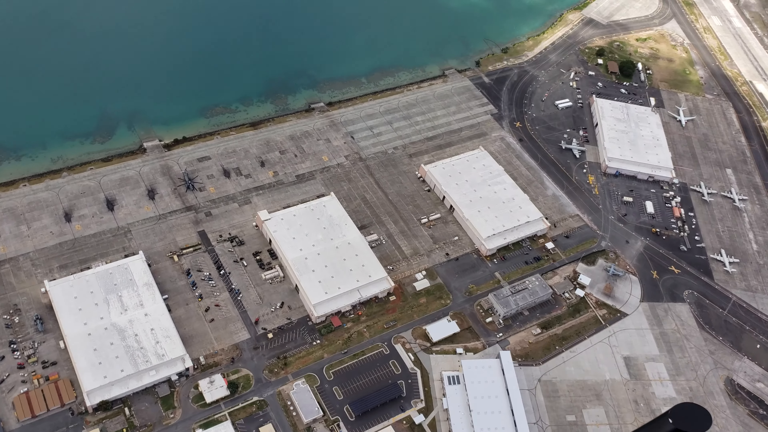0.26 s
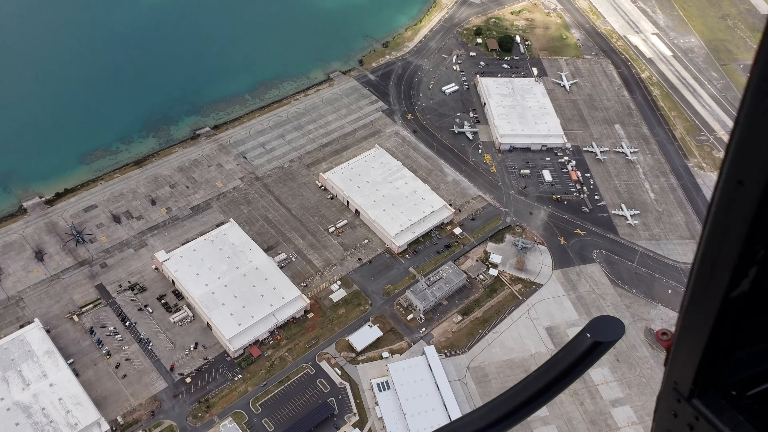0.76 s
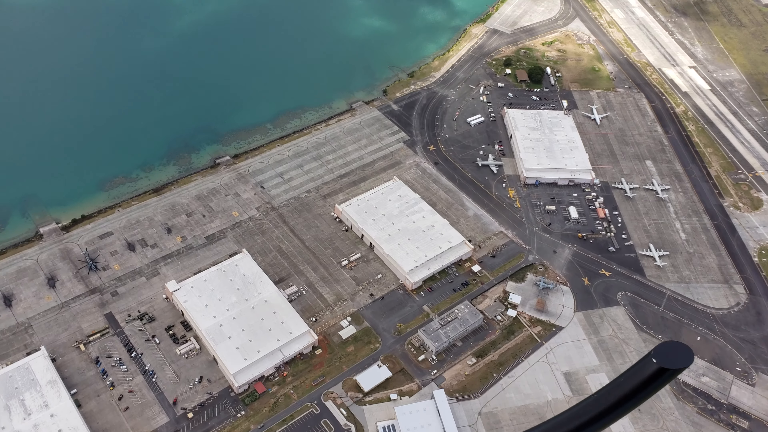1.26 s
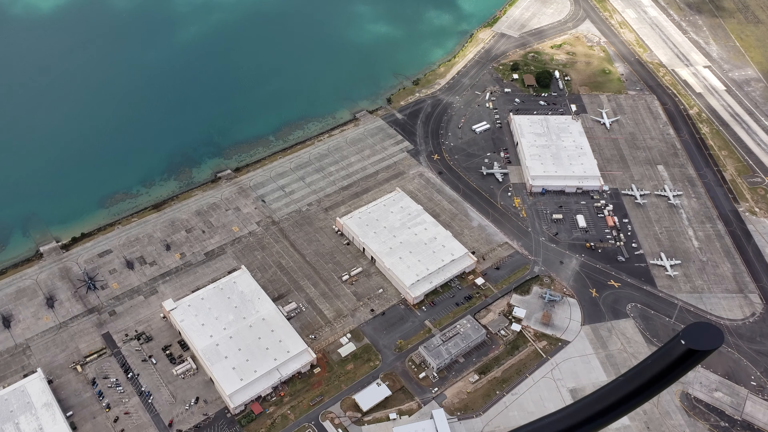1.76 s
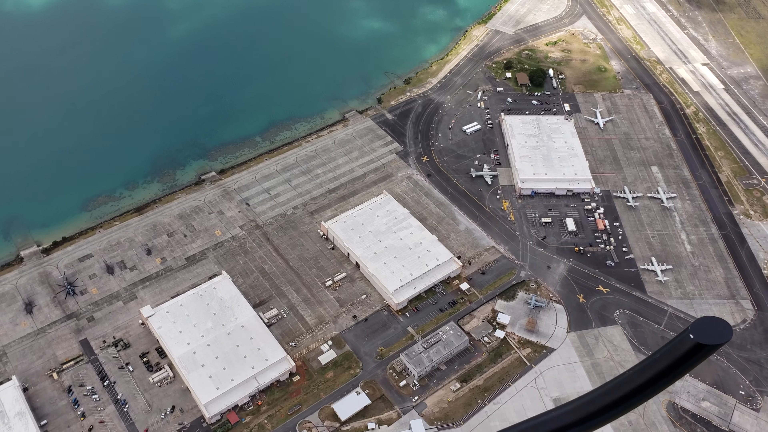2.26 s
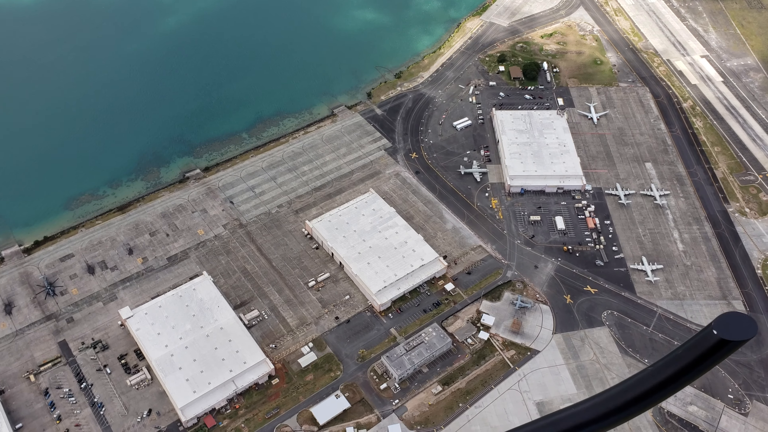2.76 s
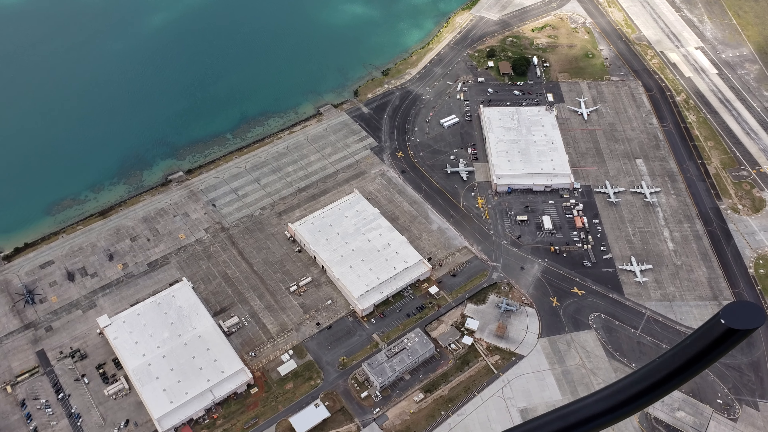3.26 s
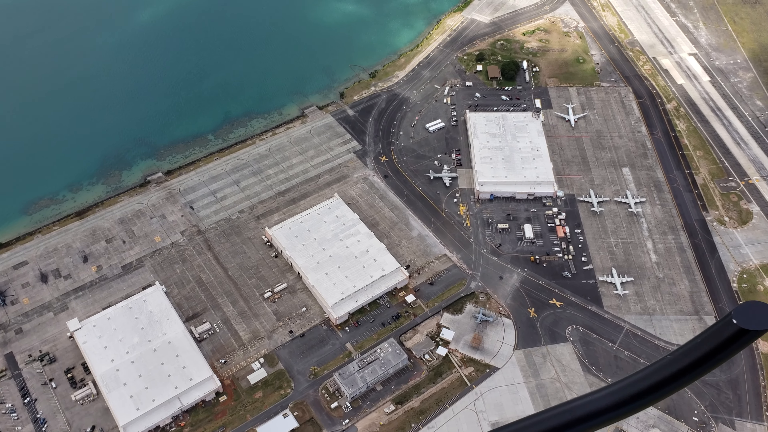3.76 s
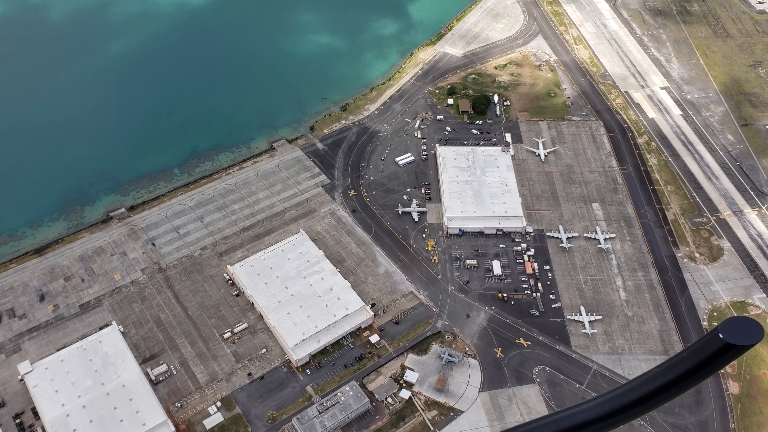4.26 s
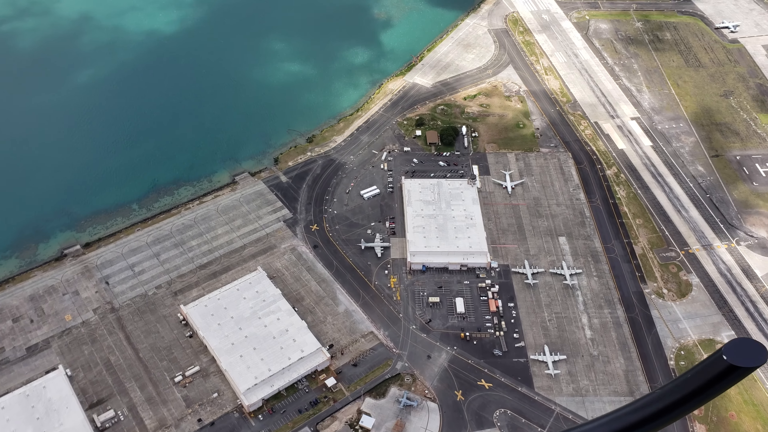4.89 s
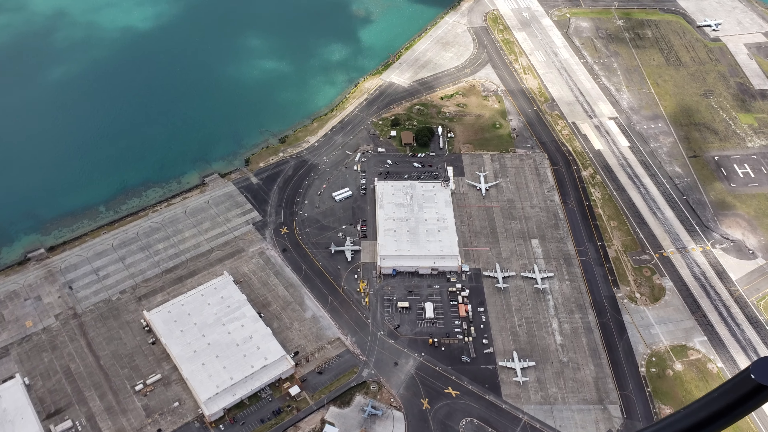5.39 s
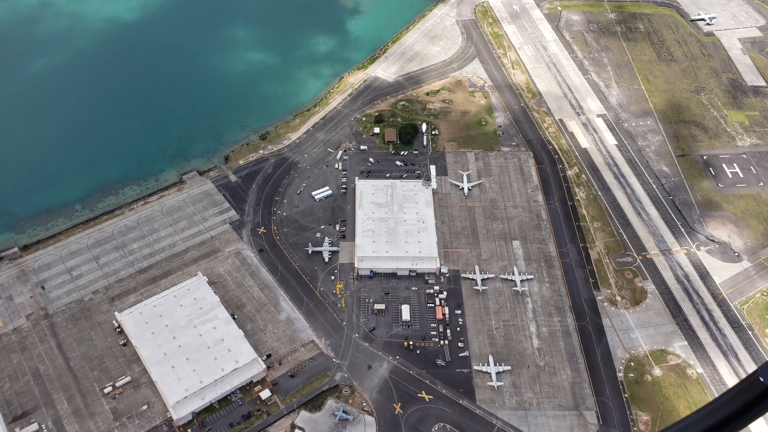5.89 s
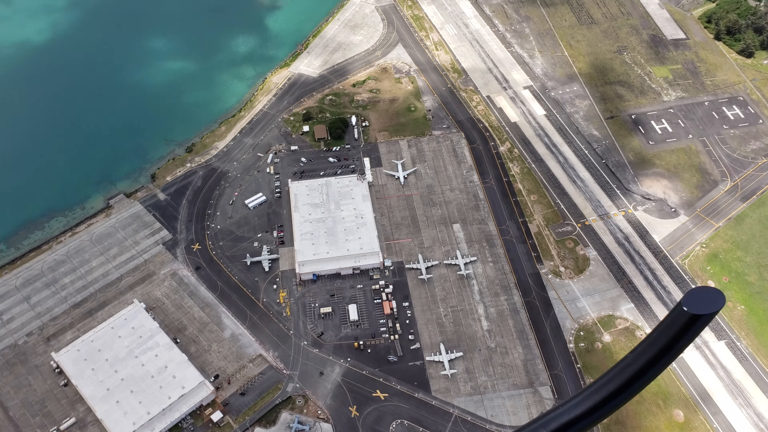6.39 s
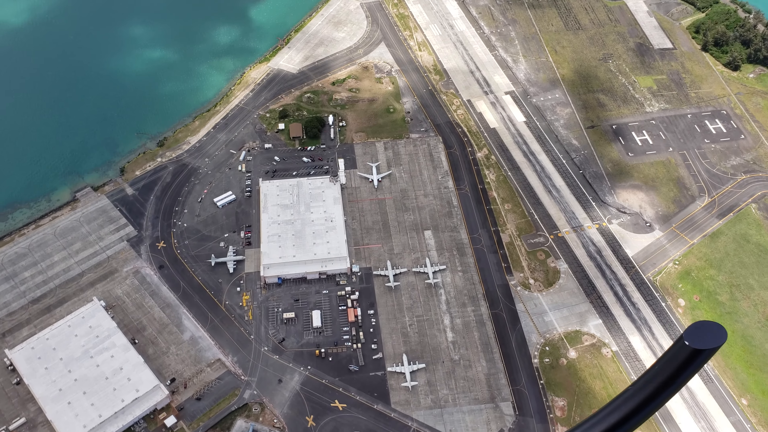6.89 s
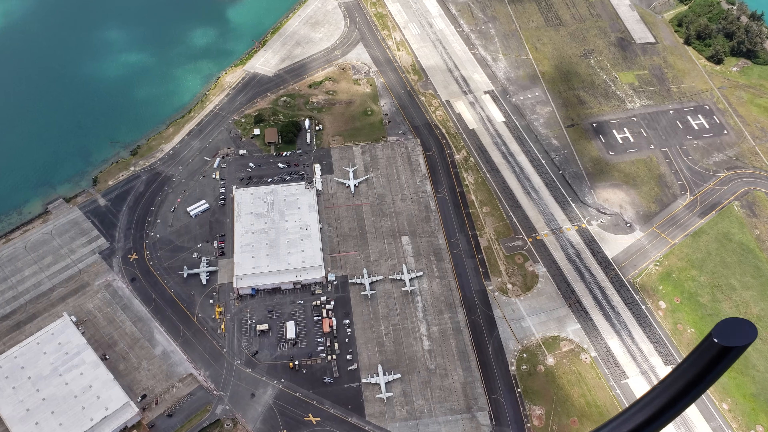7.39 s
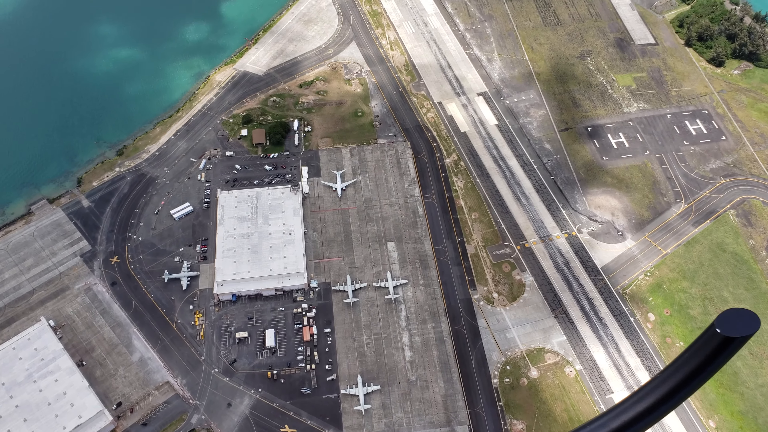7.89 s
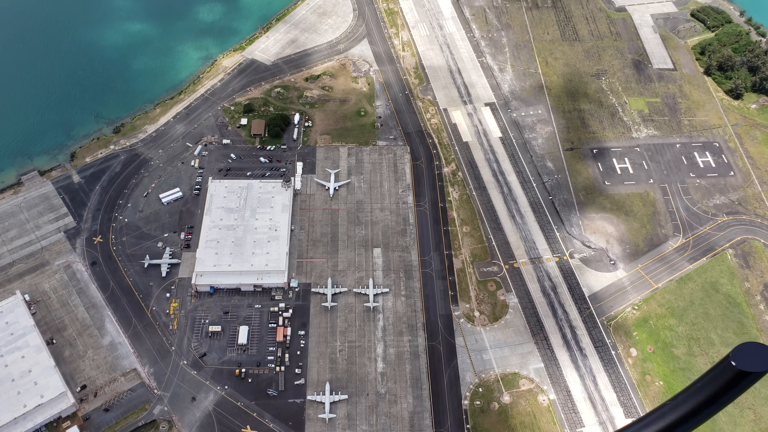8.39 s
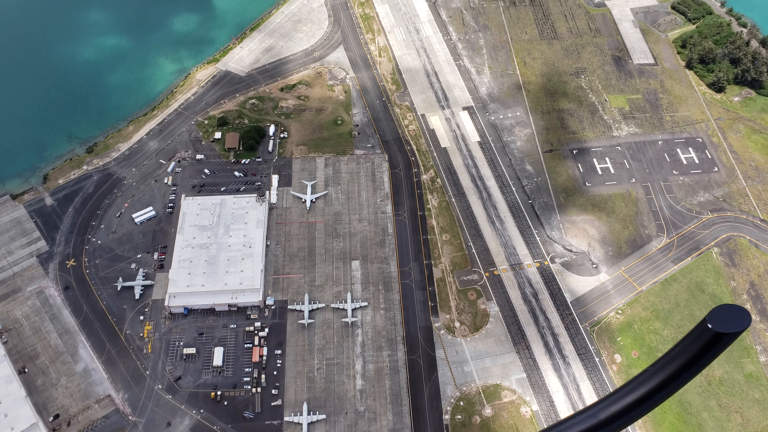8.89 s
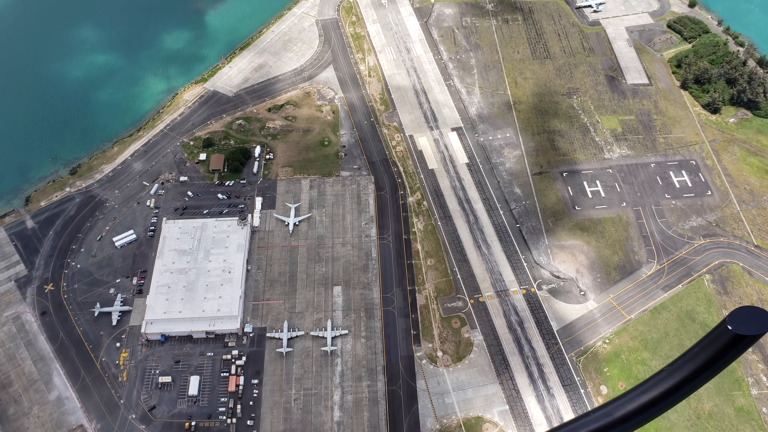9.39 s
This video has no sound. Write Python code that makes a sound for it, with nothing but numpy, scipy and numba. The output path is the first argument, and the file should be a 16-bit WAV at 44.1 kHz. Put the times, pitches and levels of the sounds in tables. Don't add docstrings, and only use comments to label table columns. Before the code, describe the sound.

At the open door of a helicopter in flight, wind buffets a handheld phone's stereo microphones, heavier on the left. A strong gust fades at once, a few tiny dry ticks sit close on the right, then rumbling gusts rise and fall with crackling edges. Steady engine hiss and fast blade swishes lie behind. A rough cluster of gusts drops suddenly past six seconds, then the wind builds again.

```python
import sys
import numpy as np
from scipy import signal
from scipy.fft import rfft, irfft, next_fast_len
from scipy.io import wavfile
from scipy.ndimage import uniform_filter1d
from numba import njit

SR = 44100
rng = np.random.default_rng(int(sys.argv[2]) if len(sys.argv) > 2 else 0)


def wav_out(sig):
    wavfile.write(sys.argv[1], SR, np.round(np.clip(np.atleast_2d(sig).T, -1, 1) * 32767).astype(np.int16))


def voltage_ratio(level):
    return 10 ** (np.asarray(level, float) / 20)


N = 425565
T = np.arange(N) / SR
SIZE = next_fast_len(N)
HZ = np.maximum(np.arange(SIZE // 2 + 1) * SR / SIZE, 1)


def along(table, hz):
    table_hz, value = np.transpose(table)
    return np.interp(np.log(hz), np.log(table_hz), value)


def noise(colour):
    inside = (HZ > colour[0][0]) & (HZ < colour[-1][0])
    return rfft(rng.standard_normal(SIZE)) * voltage_ratio(along(colour, HZ)) * inside


def band(spectrum, hz):
    weight = np.clip(1 - np.abs(2 * np.log2(HZ / hz)), 0, 1)
    return irfft(spectrum * weight, SIZE)[:N]


def band_rms(spectrum, lo_hz, hi_hz):
    inside = (HZ > lo_hz) & (HZ < hi_hz)
    return np.sqrt(2 * np.sum(np.abs(spectrum[inside]) ** 2)) / SIZE


def smooth_twice(x, length):
    return uniform_filter1d(uniform_filter1d(x, length), length)


def walk(rate_hz):
    hold = int(SR / rate_hz)
    levels = np.repeat(rng.standard_normal(N // hold + 1), hold)
    return 1.3 * smooth_twice(levels, hold)[:N]


@njit
def svf(x, hz, width):
    y, band_state, low_state = np.empty(len(x)), 0., 0.
    for i in range(len(x)):
        g, damping = np.tan(np.pi * hz[i] / SR), width / hz[i]
        v = (band_state + g * (x[i] - low_state)) / (1 + g * (g + damping))
        band_state = 2 * v - band_state
        low_state += 2 * g * v
        y[i] = damping * v
    return y


def gusts():
    # peak t/s, rise/s, fall/s, strength/dB, hiss strength/dB
    gust_list = [(0, .1, .25, 14.5, 16), (.21, 0.34, 0.03, 8.5, 11), (.33, .08, .1, 0.5, 2),
                 (.8, .08, .08, 2.5, 2), (1.76, 0.09, .15, 5, 2), (2.419, 0.054, 0.12, 1.5, 3.5),
                 (2.721, 0.18, 0.16, 5, 6), (2.9, 0.28, .1, 5, 5.5), (3.901, 0.33, 0.31, 8, 8.5),
                 (4.159, 0.14, .07, 6.5, 6.5), (4.699, .15, 0.078, 1.5, 3), (5.12, 0.087, .1, 4, 6.5),
                 (5.399, 0.26, 0.43, 10.5, 11.5), (5.69, 0.12, 0.14, 7, 11), (5.81, 0.099, .1, 9.5, 8.5),
                 (6.06, 0.21, .2, 12, 13), (6.202, 0.21, .1, 10, 12), (7.7, 0.15, 0.11, 2.5, 1),
                 (8.4, 0.17, .1, 6, 7.5), (8.538, .12, 0.13, 9.5, 10.5)]
    out = np.zeros((2, N))
    for s, rise_s, fall_s, db, hiss_db in gust_list:
        pace_s = np.where(T < s, rise_s, fall_s)
        bell = np.exp(-((T - s) / pace_s) ** 2)
        out = np.maximum(out, np.outer([db, hiss_db], bell))
    return out


def ports(colour):
    # f/Hz, share/0-1
    likeness = [(40, .92), (130, .82), (250, .92), (400, .8), (700, .65), (1000, .25), (1500, .1)]
    lag_s = .00075
    left, like = noise(colour), along(likeness, HZ)
    delayed = left * np.exp(-2j * np.pi * HZ * lag_s)
    return left, like * delayed + np.sqrt(1 - like ** 2) * noise(colour)


def buffet(level_db, pan_db):
    # f/Hz, level/dB
    buffet_colour = [(22, -24.5), (45, -9.5), (65, -0.5), (100, 3.5), (135, -1.5), (200, 0.5), (265, -6.5),
                     (320, -6), (400, -15), (500, -20), (800, -34), (1300, -67.5)]
    # f/Hz, left minus right/dB
    left_lean = [(30, -2.5), (70, -5), (140, 1.5), (330, -0.4), (500, 3), (900, 4)]
    left, right = ports(buffet_colour)
    lean_db = along(left_lean, HZ)
    left, right = left * voltage_ratio(lean_db / 2), right * voltage_ratio(-lean_db / 2)
    out = 0
    for hz in 20 * 2 ** np.arange(0, 6.6, .5):
        eddies = np.array([band(left, hz), band(right, hz)])
        power = np.mean(eddies ** 2, axis=0)
        swing = smooth_twice(power, int(.09 * SR)) / (power.mean() + 1e-18)
        out = out + eddies * (swing + .05) ** -.3
    port_db = level_db + 0.66 + np.array([pan_db, -pan_db]) / 2
    return out / band_rms(left, 40, 430) * voltage_ratio(port_db)


def turbulence(mid_db, treble_db):
    # f/Hz, level/dB
    turbulence_colour = [(350, -2.5), (600, -1.5), (1300, -10.5), (2000, -15.5), (2600, -20), (3200, -22.5),
                         (3500, -25.5), (4600, -25.5), (5000, -26.5), (7000, -26), (7700, -39),
                         (11000, -42), (15900, -46.5)]
    # f/Hz, level/dB
    lee_shadow = [(300, 3.5), (500, -4.5), (800, -20.5), (1300, -19), (3000, -21), (4400, -26.5),
                  (4900, -28), (7400, -35.5), (8200, -20.5), (11000, -15), (15900, -7)]
    left, right = ports(turbulence_colour)
    right = right * voltage_ratio(along(lee_shadow, HZ))
    strength = np.clip((mid_db + 53.0) / 14, .15, 1.2)
    mid_db = mid_db - 0.84 - 20 * np.log10(band_rms(left, 700, 1800))
    treble_db = treble_db + 0.7 - 20 * np.log10(band_rms(left, 5000, 6380))
    burst, crackle, out = walk(90), walk(420), 0
    snap = voltage_ratio(snaps())
    for hz in 320 * 2 ** np.arange(0, 6.1, .5):
        bright = np.clip(np.log(hz / 1600) / np.log(3.2), 0, 1)
        gusty_db = 0.41 * burst + (1.4 + 0.45 * bright) * crackle + 1.3 * walk(60)
        rough = voltage_ratio(strength * gusty_db + .5 * walk(23))
        rough = rough / np.sqrt(uniform_filter1d(rough ** 2, int(.08 * SR)))
        level = voltage_ratio(mid_db + bright * (treble_db - mid_db))
        eddies = np.array([band(left, hz), band(right, hz)])
        out = out + snap * rough * level * eddies
    return out


def machinery(level_db):
    # f/Hz, level/dB
    engine_left = [(600, -13.5), (1300, -11), (1700, 2), (2050, 0), (2500, 0), (3200, -8), (3500, -12),
                   (4600, -20), (4900, -27.5), (7200, -21.5), (8500, -31.5), (15900, -30)]
    engine_right = [(600, -18), (1050, -17), (1700, -14.5), (2200, -11), (3200, -27), (3500, -20.5),
                    (4500, -26), (4800, -50), (7800, -35.5), (8400, -25), (9500, -26.5), (10300, -28),
                    (12500, -31.5), (15900, -26)]
    # place in the turn/0-1, length/turns, start f/Hz, end f/Hz, width/Hz, level/dB
    swish_left = [
        (.305, .075, 4400, 3500, 1050, 20),
        (.36, .06, 8400, 7000, 2600, 11),
        (.87, .06, 8800, 6900, 3000, 12.5),
        (.12, .08, 14800, 14800, 4500, 0),
        (.62, .1, 14000, 13500, 7000, 1),
        (.8, .06, 4600, 4400, 1000, 11),
        (.32, .05, 2600, 2400, 600, 21),
    ]
    swish_right = [
        (.31, .075, 4400, 3700, 1200, 11),
        (.33, .1, 9000, 8700, 2400, 1),
        (.85, .09, 9200, 8800, 2100, 5.5),
        (.83, .1, 13500, 13200, 6000, 2.5),
        (.3, .1, 13500, 13200, 6000, -1),
        (.33, .05, 2700, 2400, 600, 10),
        (.82, .05, 4600, 4400, 900, 2),
    ]
    hiss = irfft(np.array([noise(engine_left), noise(engine_right)]), SIZE)[:, :N]
    swish = np.array([voltage_ratio(1.0) * blades(swish_left), voltage_ratio(-0.1) * blades(swish_right)])
    return voltage_ratio(level_db) * (voltage_ratio(37) * hiss + swish)


def blades(swishes):
    rotor_hz = 6.765
    out = 0
    for place, length, start_hz, end_hz, width_hz, db in swishes:
        turns = rotor_hz * T - place + .5
        offset = (turns % 1 - .5) / length
        size_db = 1.8 * rng.standard_normal(N // 1000)[turns.astype(int) + 1]
        hz = start_hz + (end_hz - start_hz) * np.clip(.5 + offset / 2, 0, 1)
        puff = svf(rng.standard_normal(N), hz, 1. * width_hz)
        puff = svf(puff, hz, 1. * width_hz)
        out = out + puff / puff.std() * np.exp(-offset ** 2) * voltage_ratio(db + size_db)
    return out


def ticks():
    # t/s, peak level/dB
    tick_list = [
        (0.0343, -39),
        (0.0369, -41),
        (0.0404, -44),
        (0.62, -47.5),
        (0.7731, -48.5),
        (0.8812, -50),
        (1.4129, -52),
        (1.5867, -58.5),
        (1.632, -39.5),
        (3.0507, -47.5),
    ]
    out, tail_s = np.zeros(N + 200), np.arange(200) / SR
    for s, db in tick_list:
        grain = rng.standard_normal(200) * np.exp(-tail_s / .00035)
        out[int(s * SR):][:200] += voltage_ratio(db + 9.5) * grain
    high_pass = signal.butter(2, 5000, "high", fs=SR, output="sos")
    bright = signal.sosfilt(high_pass, out[:N])
    return np.array([voltage_ratio(-24.0) * bright, bright])


def snaps():
    # t/s, left rise/dB, right rise/dB
    snap_list = [(0.055, 0, 13), (.164, 4, 4.5), (.205, 4.5, 5.5), (1.26, 8.5, 2.5), (2.018, 12, 6),
                 (2.625, 8, 2.5), (2.662, 8.5, 5), (2.751, 7.5, 6.5), (2.937, 7, 6.5), (3.003, 10, -2),
                 (3.062, 8.5, 5), (3.312, 5, 0.5), (3.915, 1.5, 10.5), (4.096, 10.5, 5), (5.344, 6.5, 13),
                 (5.374, 1.5, 7.5), (5.441, 3.5, 9), (5.564, -4.5, 6.5), (5.623, 4.5, 8),
                 (5.821, 8.5, 11.5), (6.038, 2.5, 12), (6.088, 0.5, 12.5), (6.226, 6, 6), (8.209, 4, 6),
                 (8.423, 9.5, -3), (8.54, 6.5, 4), (8.581, -5, 9), (8.83, 4.5, -0.5), (9.141, 10, 10)]
    out, around = np.zeros((2, N)), np.arange(-300, 300)
    bump = np.exp(-(around / SR / 0.0012) ** 2)
    for s, left_db, right_db in snap_list:
        out[:, int(s * SR) + around] += np.outer([left_db, right_db], bump)
    return out


def scene():
    # t/s, flow level/dB, wind angle as left minus right/dB
    airflow = [(0, -18.5, 4), (.45, -22, 5), (.6, -27, 0.5), (1.4, -23.5, 6.5), (1.6, -22, 7),
               (2.4, -20.5, 6.5), (2.55, -17, 8), (3.5, -16.5, 6.5), (4.25, -18, 5), (4.45, -19, 6),
               (5.0, -19.5, 5), (5.2, -18, 6), (6.32, -20.5, -0.5), (6.37, -27, 1.5), (7.4, -26, 2),
               (8.1, -22, 6), (8.7, -20, 4.5), (9.65, -17.5, 5)]
    # t/s, level/dB
    machine_level = [(0, -74.5), (2.1, -74.5), (3.3, -69.5), (4.0, -75), (4.7, -72), (5.2, -73.5),
                     (6.3, -76), (7.3, -75.5), (7.9, -72), (8.4, -77), (9.0, -70), (9.65, -72)]
    usual_flow_db = -21
    s, flow_db, angle_db = np.transpose(airflow)
    flow_db = np.interp(T, s, flow_db) - usual_flow_db
    gust_db, hiss_db = gusts()
    buffet_db = -21.5 + 0.94 * flow_db + 0.65 * gust_db
    mid_db = -40.5 + .72 * flow_db + 0.97 * gust_db
    treble_db = -63 + 0.75 * flow_db + 1.08 * hiss_db
    pan_db = np.interp(T, s, angle_db) - 0.2 * gust_db
    wind = buffet(buffet_db, pan_db) + turbulence(mid_db, treble_db)
    machine_db = np.interp(T, *np.transpose(machine_level))
    return wind + machinery(machine_db) + ticks()


def top_cut(x):
    return signal.sosfilt(signal.butter(12, 15750, fs=SR, output="sos"), x)


def record(dry):
    rounded = np.tanh(1.023 * dry) / 1.154
    return top_cut(rounded)


dry = scene()
out = record(dry)
wav_out(out)
```